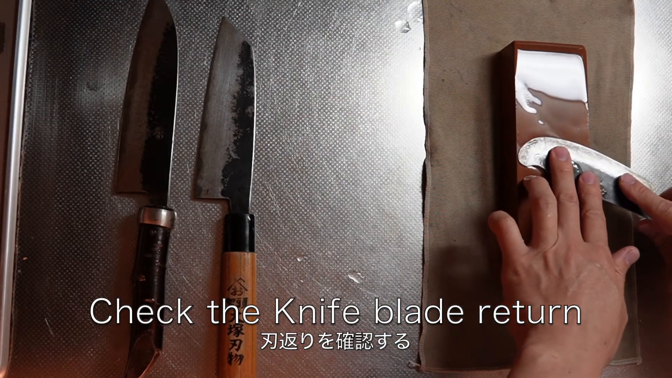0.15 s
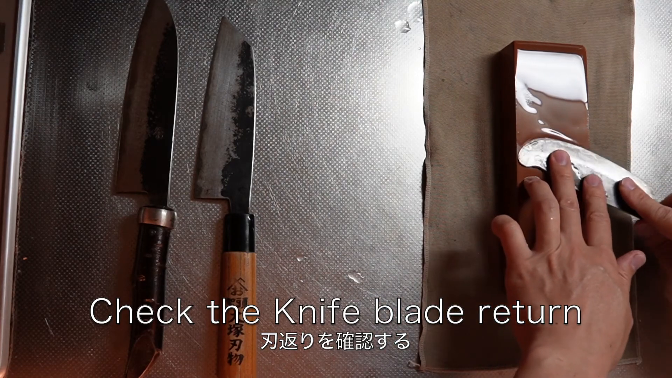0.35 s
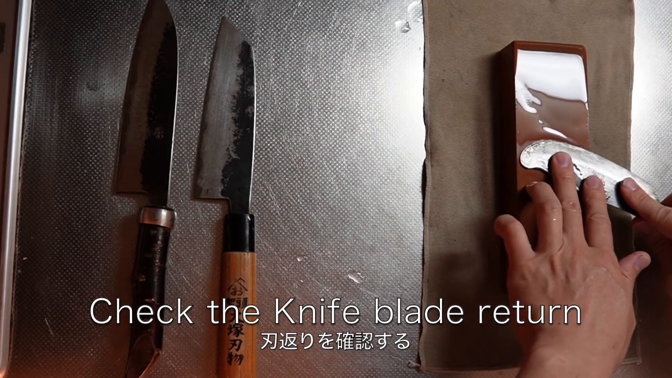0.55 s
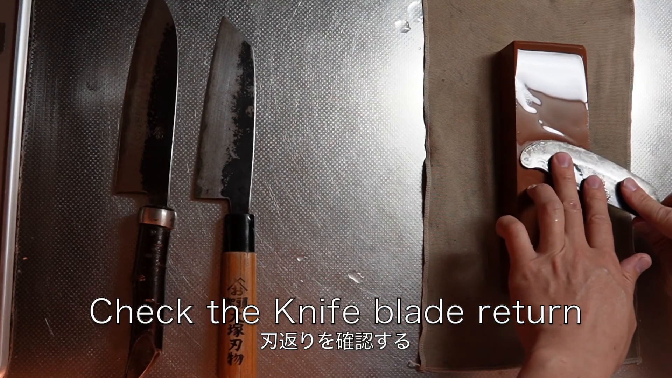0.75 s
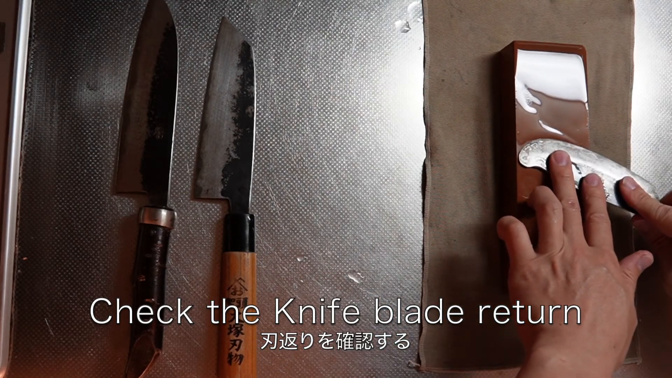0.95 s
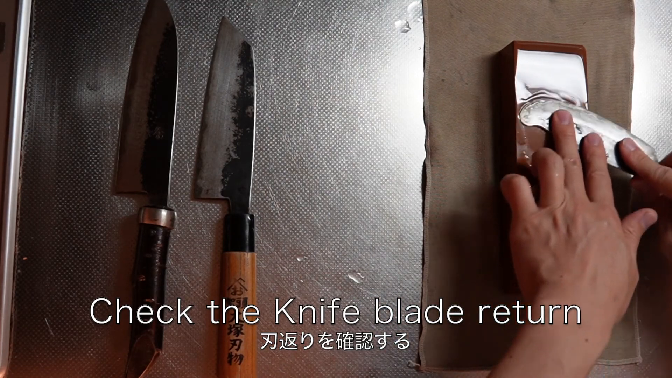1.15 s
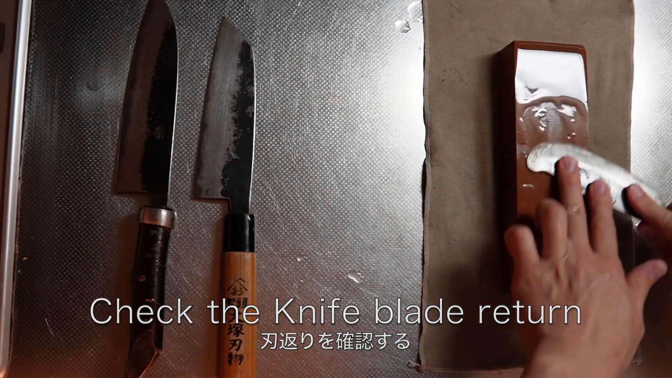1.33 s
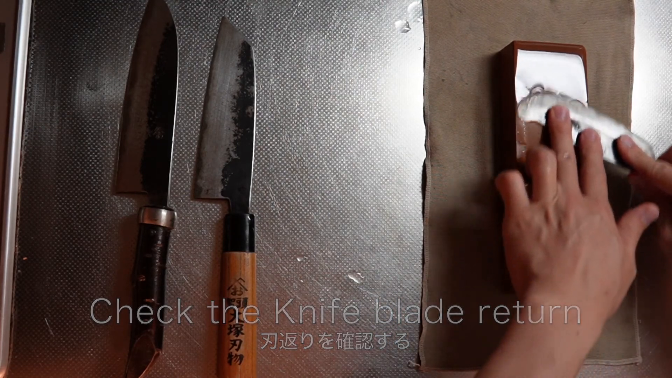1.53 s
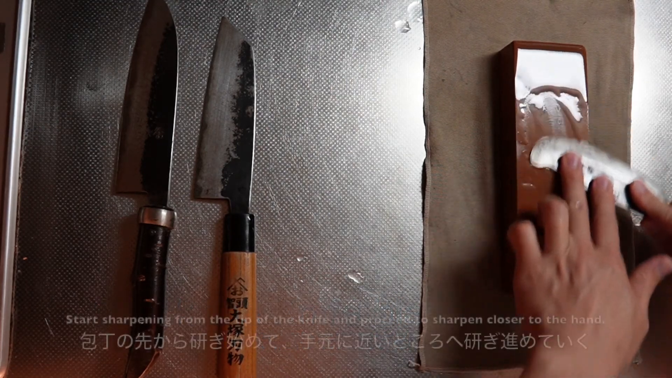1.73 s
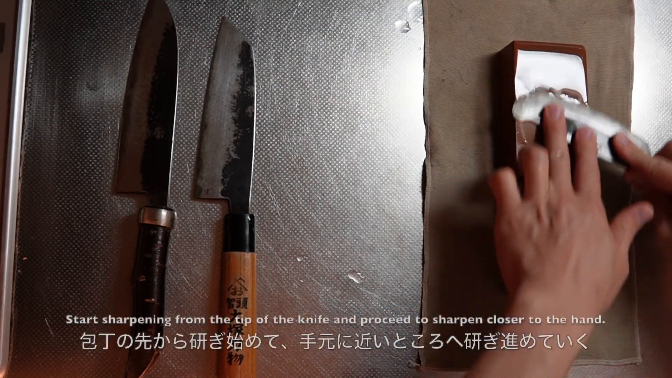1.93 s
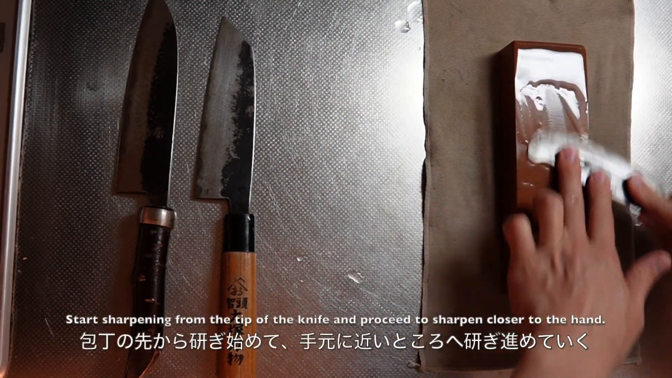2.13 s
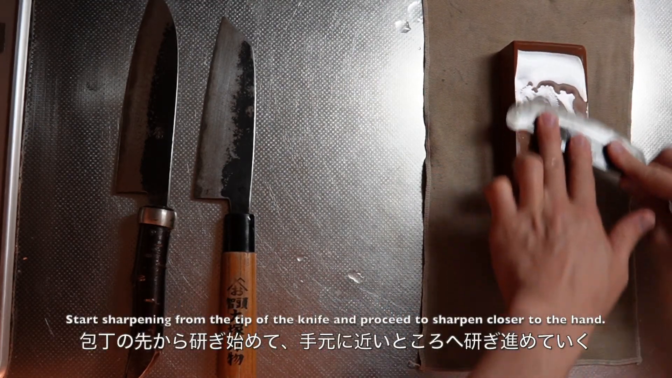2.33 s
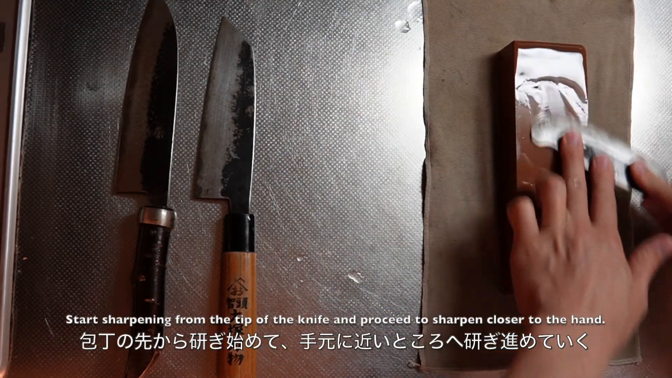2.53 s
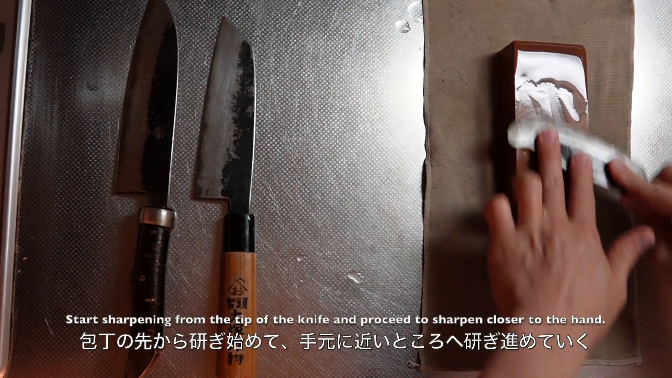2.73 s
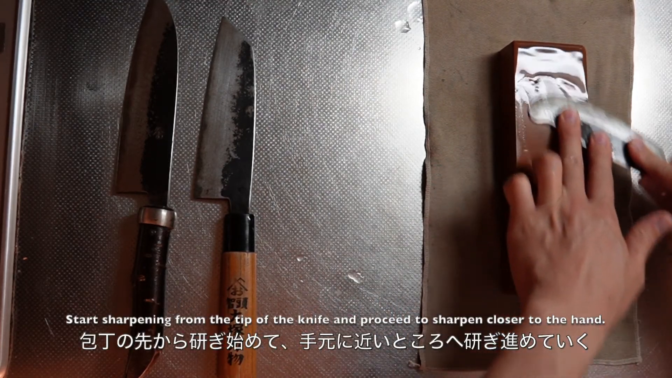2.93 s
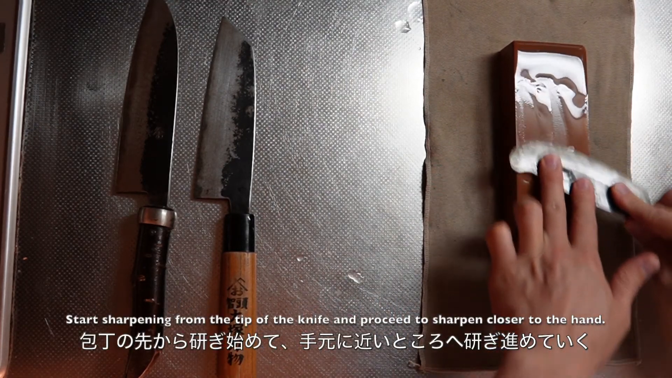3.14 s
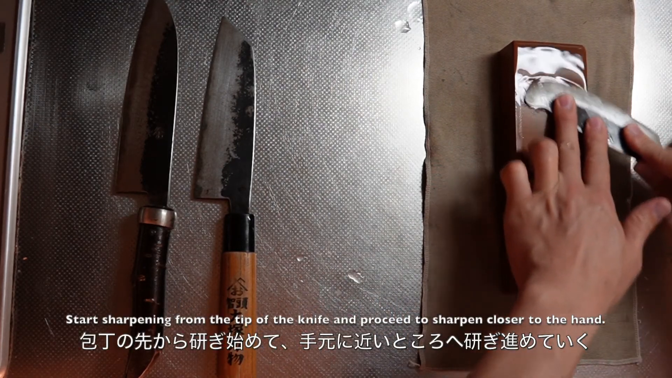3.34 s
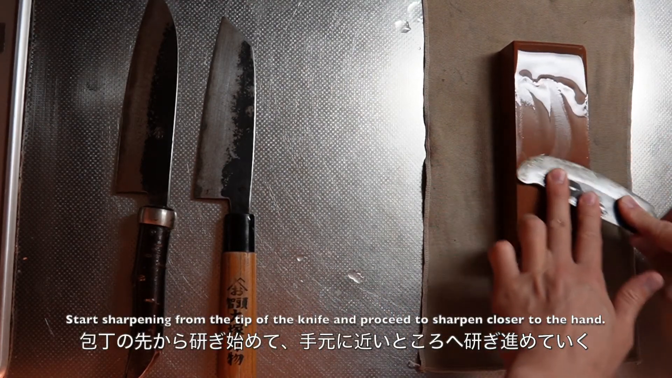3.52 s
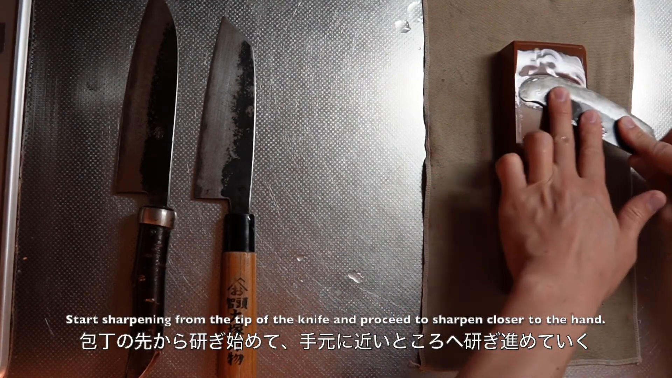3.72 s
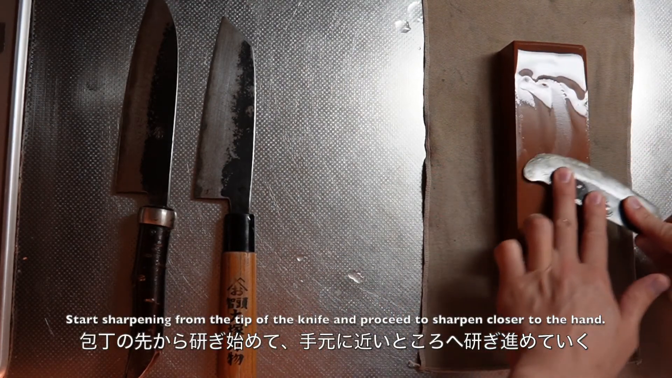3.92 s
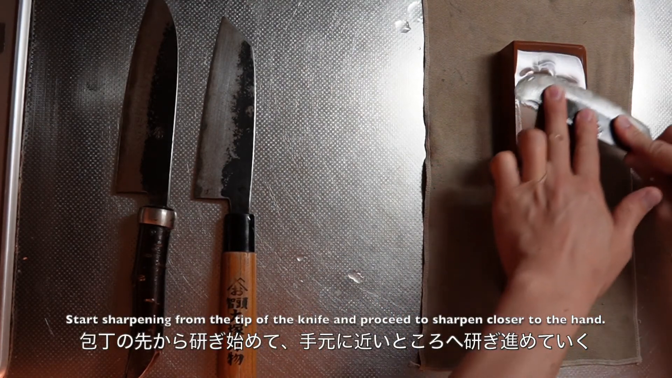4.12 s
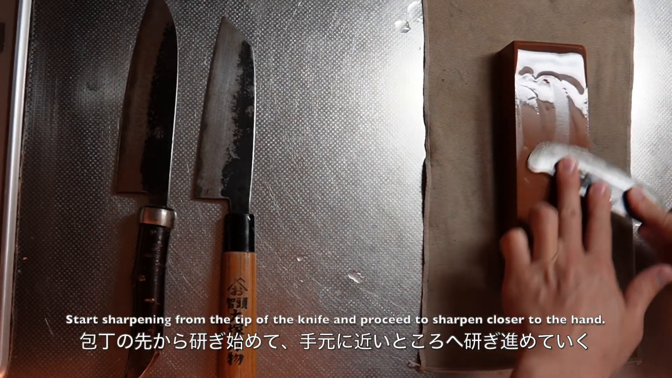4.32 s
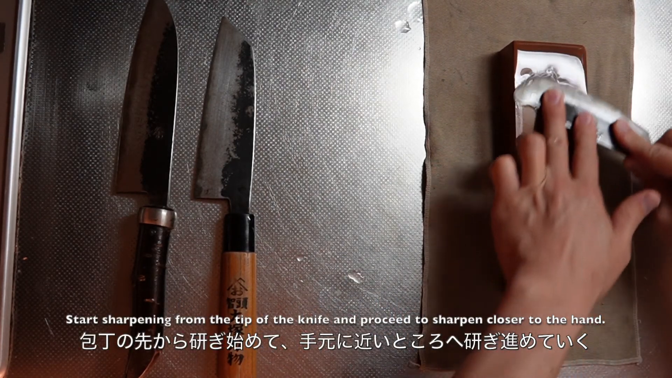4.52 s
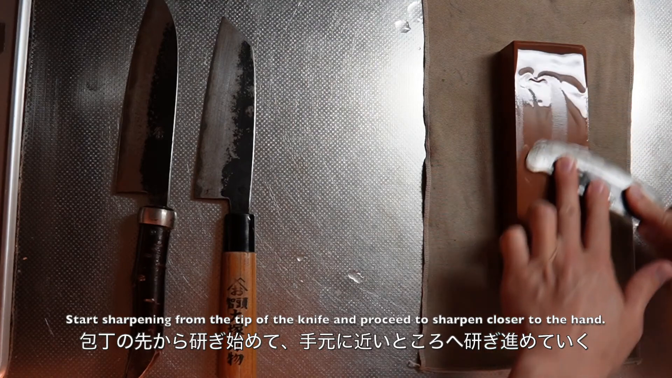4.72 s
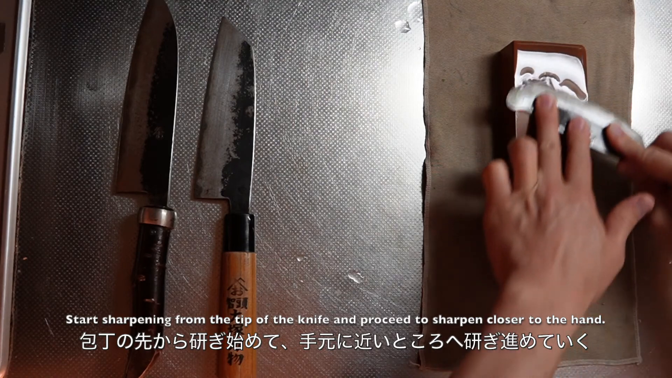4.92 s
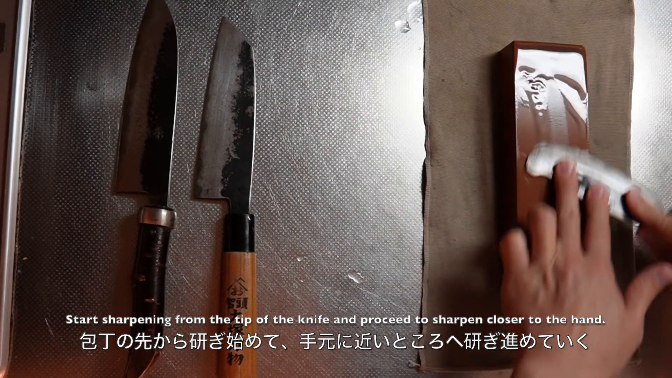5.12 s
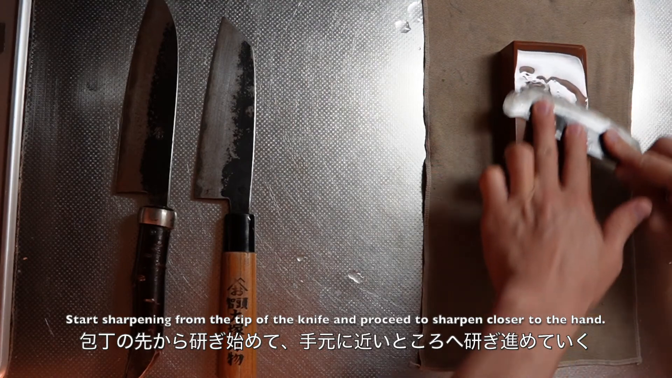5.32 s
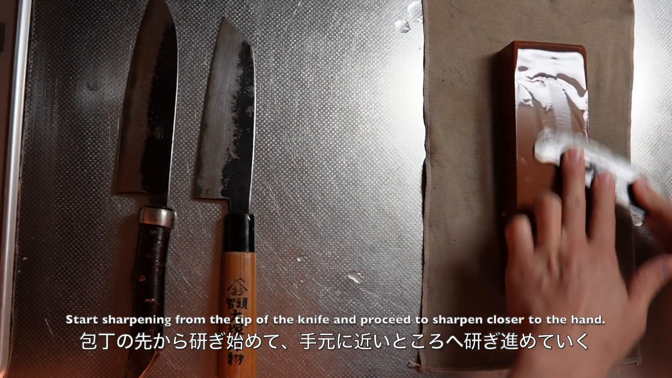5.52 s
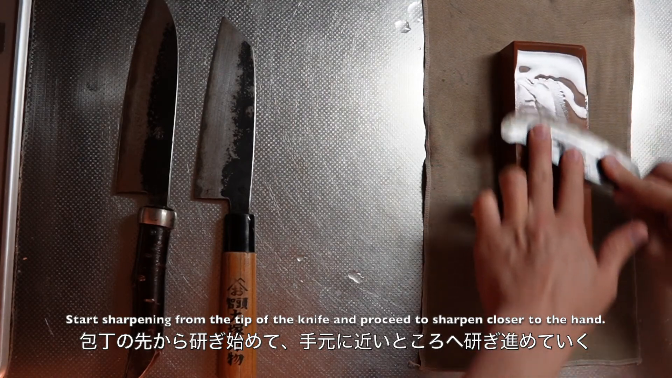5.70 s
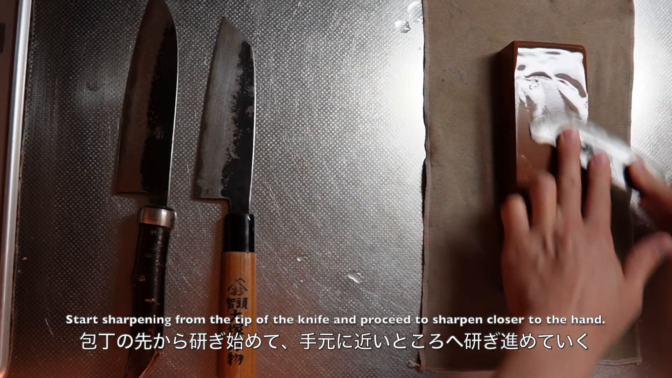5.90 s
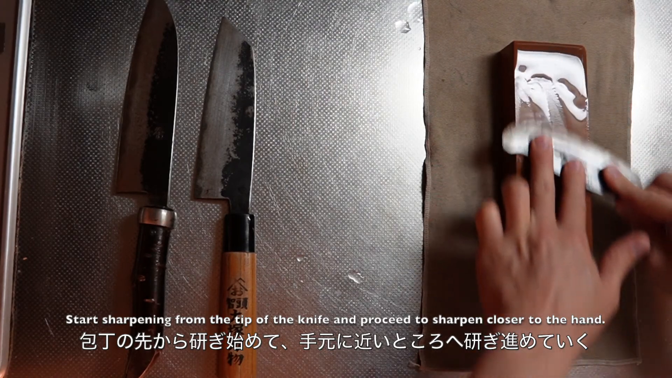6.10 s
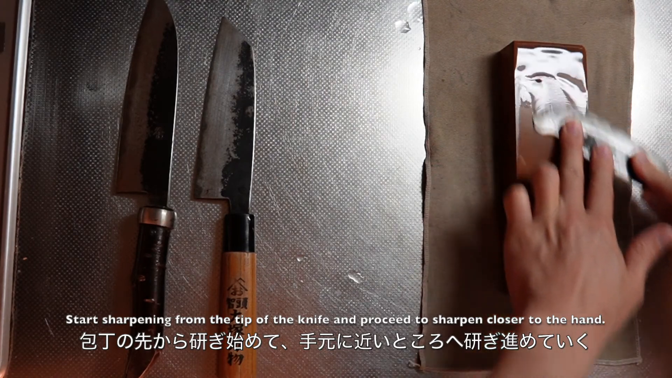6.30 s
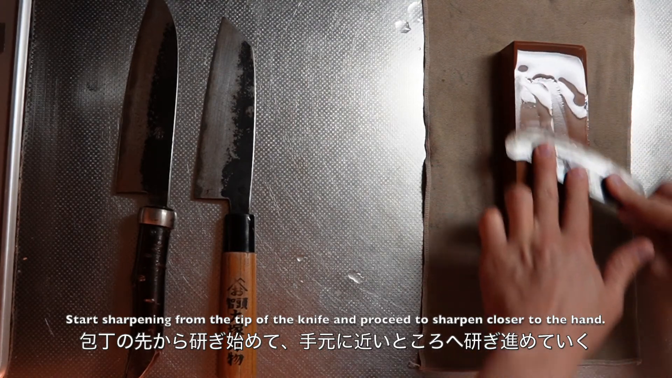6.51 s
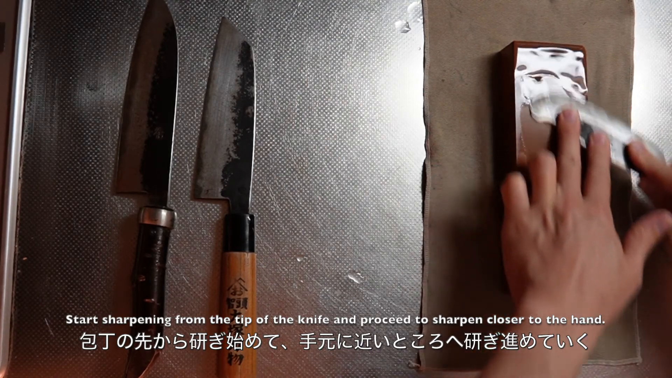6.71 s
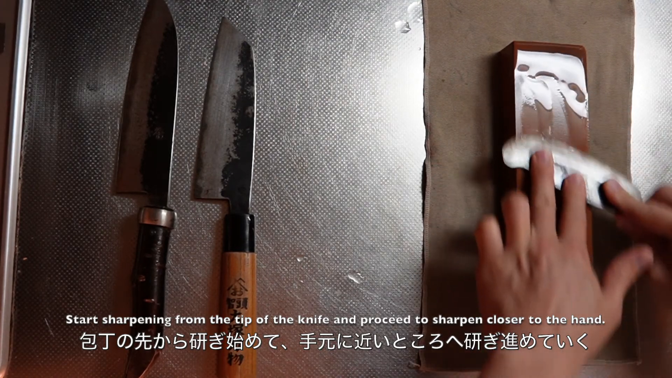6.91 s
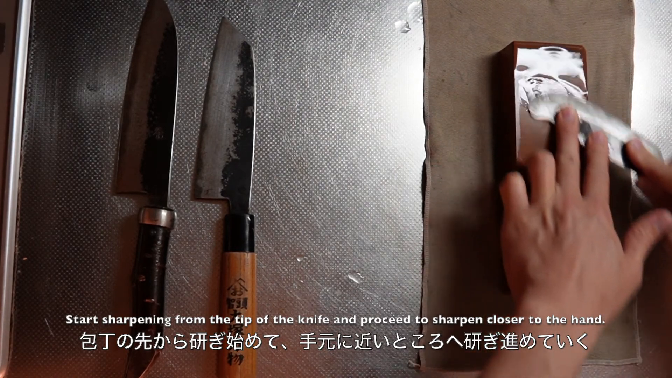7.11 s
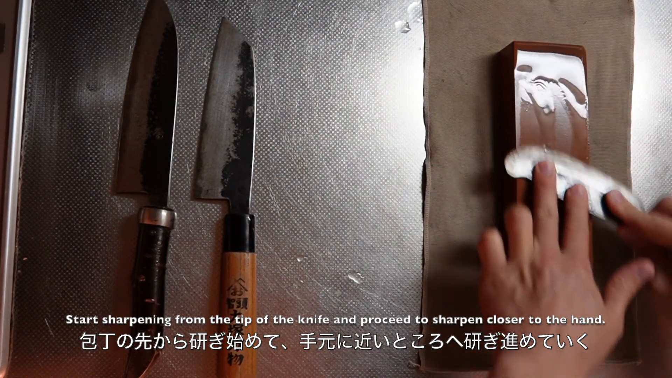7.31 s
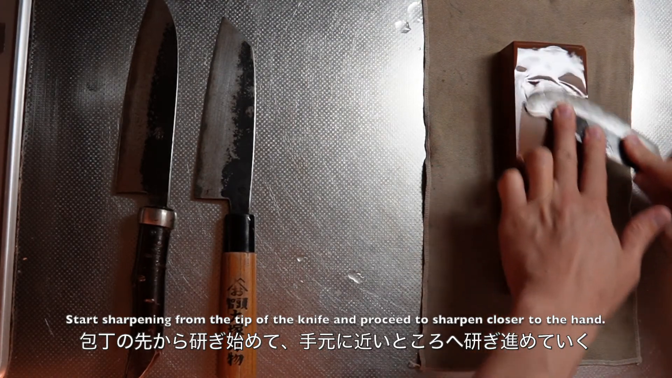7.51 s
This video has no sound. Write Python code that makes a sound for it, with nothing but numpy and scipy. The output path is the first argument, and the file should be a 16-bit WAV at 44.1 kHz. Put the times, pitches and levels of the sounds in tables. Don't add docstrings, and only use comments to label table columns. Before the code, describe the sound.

For the first second there is only soft room air, a low motor hum, a tiny tick and thin wet squeaks as the blade is set down. Then a steel knife is stroked steadily to and fro on a wet whetstone, nearly five bright, gritty, metallic scrapes a second, until the end. Close stereo microphone, quiet kitchen, no obvious echo.

```python
import sys
import numpy as np
from scipy import signal
from scipy.fft import rfft, irfft, next_fast_len
from scipy.io import wavfile

SR = 44100
rng = np.random.default_rng(int(sys.argv[2]) if len(sys.argv) > 2 else 0)


def master_out(mix):
    frames = np.transpose(np.atleast_2d(mix))
    ceiling = np.clip(frames, -1, 1)
    pcm = np.round(ceiling * 32767).astype(np.int16)
    wavfile.write(sys.argv[1], SR, pcm)


def invert_db(level):
    return 10 ** (np.asarray(level, dtype=float) / 20)


N = 332955

# [f/Hz, width/Hz, level/dB]
MAIN_RING = [(3820, 90, -5), (3985, 80, .3), (4090, 110, -1.5), (4250, 130, -4), (4420, 170, -7.5)]
SECOND_RING = [(6590, 110, 0.), (6800, 100, .5), (6970, 90, .5)]
UPPER_RINGS = [(4800, 120, -5), (5092, 60, 0.), (5420, 90, -5), (5728, 90, 0.), (6280, 130, -1.5),
               (7140, 60, -1.5), (7280, 70, -2.5), (7675, 100, -4)]
LOW_RINGS = [(2720, 90, -5.5), (2870, 60, -2), (3100, 170, -6), (3313, 40, -1.), (3561, 80, -2)]
HISS_RINGS = [(8250, 130, -1.5), (8850, 130, -2.5), (10020, 160, 0.), (11720, 200, -1.5)]
STONE_RINGS = [(1200, 110, -5), (1240, 15, -2), (1800, 150, -5), (2015, 90, 0.), (2250, 150, -1.5)]
# [f/Hz, level/dB per Hz]
SCRATCH = [(2550, -9), (2700, -14), (3600, -12), (4600, -2.5), (6000, -3.5), (7000, -4), (7700, -11),
           (9000, -6.5), (11000, -7.5), (13000, -7.5), (15500, -8.5)]
# [t/s, level/dB]
SECOND_SHARE = [(0., -8), (1.3, -4), (2.5, -6), (4.5, -5), (7.55, -4)]
# [f/Hz, sway/dB, place in the to-and-fro after the push bite/0-1]
CONTACT = [ (2720, 3.2, .6), (2870, 2.2, .43), (3313, 6.5, .06), (3561, 4.5, .57), (3985, 1.5, .08),
           (4090, 1.1, .8), (4250, 2.1, .5), (4420, 3.5, .46), (4800, 3.1, .8), (5092, 2.1, .37),
           (6280, 4.1, .83), (6590, 1.5, .56), (6800, 2.2, .42), (6970, 2.1, .39), (7140, 1.5, .6),
           (7280, 3.5, .64), (7675, 2.5, .45), (8250, 3.5, .6), (10020, 3.1, .85)]
# [f/Hz, likeness/0-1]
BLADE_ALIKE = [(1200, .8), (2800, .91), (4200, .85), (6500, .74), (9000, .6), (13000, .44)]
# [f/Hz, left over right/dB]
BLADE_PAN = [(2800, -.1), (5000, -.3), (9500, 1.), (13500, -.1)]

# [t/s, pressure/dB, free ringing of the blade/dB]
SETTLING = [
    (0., -20, -1),
    (.12, -26, -1),
    (.38, -23, -3),
    (.5, -21, -2),
    (.62, -26, -4),
    (.72, -31, 2),
    (.95, -41, 0.),
    (1., -24, 6),
]
WORKING = [(1.06, -9.2, -0.6), (1.12, -4.8, 1.1), (1.4, -0.6, 2.9), (2.3, 1.8, 0.4), (3.2, 2.0, -0.3),
           (4.2, -0.3, -0.1), (5.2, 0.7, -1.2), (6.3, -0.7, -1.2), (7.55, -3.2, -1.0)]
# [bite t/s, bite/dB, ringing/dB, slide t/s, slide/dB]
PULLS = [(1.077, 6.2, 1.1, 1.114, 1.4), (1.4, 6.1, -0.0, 1.489, 4.4), (1.827, 6.7, -0.4, 1.902, 3.6),
         (2.251, 7.2, -0.6, 2.332, 4.9), (2.666, 7.3, -0.7, 2.756, 4.6), (3.11, 7.9, -0.3, 3.19, 4.2),
         (3.541, 6.9, -0.0, 3.619, 5.2), (3.969, 6.0, -0.8, 4.041, 5.2), (4.394, 4.9, 0.3, 4.462, 5.6),
         (4.819, 6.0, 0.2, 4.871, 5.4), (5.211, 5.5, -2.0, 5.289, 8.4), (5.628, 5.5, -0.1, 5.697, 6.6),
         (6.049, 4.4, 0.2, 6.121, 6.9), (6.455, 5.8, 0.1, 6.533, 8.2), (6.882, 7.0, -0.3, 6.953, 7.8),
         (7.293, 7.2, 0.1, 7.364, 8.5)]
PUSHES = [(1.222, 8.2, -1.6, 1.306, 5.9), (1.644, 6.5, -1.3, 1.711, 6.0), (2.053, 7.4, -3.2, 2.114, 6.3),
          (2.461, 5.6, 2.1, 2.519, 4.3), (2.913, 5.5, 0.9, 2.973, 5.1), (3.342, 4.6, 0.7, 3.401, 3.3),
          (3.773, 5.5, 1.7, 3.822, 4.1), (4.195, 7.4, -0.7, 4.246, 5.9), (4.615, 7.7, 0.3, 4.672, 4.5),
          (5.017, 5.2, 3.2, 5.062, 4.9), (5.433, 5.9, 2.7, 5.474, 6.0), (5.865, 8.3, 0.5, 5.914, 5.2),
          (6.265, 8.3, 0.4, 6.314, 7.4), (6.686, 8.9, -0.6, 6.744, 7.6), (7.096, 7.7, 1.1, 7.149, 7.6),
          (7.507, 9.1, -1.5, 7.574, 9.1)]
# [t/s, level/dB]
FALTERS = [
    (1.232, -6.6),
    (1.654, -7.6),
    (2.07, -6.2),
]
# [t/s, level/dB]
NUDGE = [
    (.452, 12),
]
# (rise/s, fall/s)
PULL_BITE_S, PULL_SLIDE_S, PUSH_BITE_S, PUSH_SLIDE_S = (.034, .033), (.026, .055), (.058, .021), (.028, .037)
NUDGE_S, FALTER_S = (.022, .018), (.016, .03)
PULL_BITE, PULL_SLIDE = (.94, 1.18, .98, .87), (-.01, .88, 1.08, .33)
PUSH_BITE, PUSH_SLIDE = (1.32, 1.01, .38, .6), (.74, .98, .92, .89)
FALTER, RINGING = (.49, .41, 1.01, -.21), (1.15, -.11, -.51, -.12)
NUDGED = (1.2, .95, .5, .6)
VOICE_DB = (-49.9, -48.3, -49.0, -56.4)

# [t/s, peak level/dB, ring f/Hz]
SNAGS = [(1.3009, -37, 4030), (2.3893, -24, 4100), (2.4368, -35, 4220), (3.0903, -16, 5240),
         (3.7328, -30, 3990), (4.194, -28.5, 4150), (4.5709, -27, 4200), (4.996, -31, 4200),
         (5.3108, -25, 4530), (5.433, -34, 4040), (5.831, -26, 4780), (5.85, -29, 3970),
         (6.1449, -24, 5030), (6.1848, -31, 4150)]
# [t/s, peak level/dB, ring f/Hz]
TICKS = [
    (.2444, -44.5, 9000),
    (.2462, -42.5, 6500),
    (.2476, -48, 4700),
    (.5145, -54, 8000),
]
# [t/s, f/Hz, level/dB]
HIGH_SQUEAK = [(.2, 11300, -82), (.255, 12950, -77), (.315, 12150, -76), (.395, 12800, -71),
               (.44, 13000, -75), (.515, 13400, -74), (.555, 12750, -72), (.59, 13050, -73),
               (.65, 12000, -84)]
TOP_SQUEAK = [(.29, 13900, -85), (.33, 14150, -81), (.37, 14500, -82), (.43, 14850, -80), (.47, 14900, -85)]
LOW_SQUEAK = [(.2, 5100, -82), (.275, 5480, -73), (.31, 5270, -73), (.365, 5250, -71), (.39, 5250, -86),
              (.44, 5150, -73), (.52, 5580, -74), (.61, 5580, -79)]
MID_SQUEAK = [(0.05, 6715, -93), (0.096, 6860, -83), (0.158, 6682, -90), (0.192, 6849, -74),
              (0.24, 6703, -80)]
DULL_SQUEAK = [(.16, 4250, -76), (.2, 4200, -69), (.215, 4150, -75)]

# [t/s, f/Hz, level/dB]
MOAN = [
    (0., 252, -61),
    (.14, 255, -61),
    (.21, 250, -70),
]
# [f/Hz, width/Hz, rms level/dB]
MOTOR = [(199, 30, -74), (260, 20, -72), (376, 12, -75), (495, 8, -74), (590, 40, -76), (1105, 3, -77.5)]
# [t/s, level/dB]
WHINE = [(0., -66), (.45, -69), (.65, -64.5), (1., -60), (1.9, -75), (2.5, -69), (3., -70), (3.5, -61),
         (4.3, -69), (5., -71), (5.5, -60.5), (6.6, -73), (7.55, -64)]
# [f/Hz, level/dB per Hz]
ROOM = [(20, -34), (40, -7), (75, -11.5), (120, -7), (190, -2), (260, -5), (330, -8.5), (600, -13.5),
        (900, -19), (1600, -18.5), (2100, -27.5), (2800, -24), (6000, -33), (15700, -39)]
# [t/s, level/dB]
ROOM_LEVEL = [(0., -47), (.8, -49), (1.2, -47.5), (4., -47), (7.55, -47)]
# [f/Hz, likeness/0-1]
ROOM_ALIKE = [(60, 0.97), (180, 0.95), (550, 0.83), (1650, 0.53), (4970, 0.55), (15000, 0.13)]


def strokes():
    main_db, upper_db, hiss_db, low_db = effort()
    coarse = grit(9000, 1.4, clump_db=-0.24, jolts_per_s=44, jolt_s=0.002)
    fine = grit(18000, 0.75, clump_db=-0.2, jolts_per_s=37, jolt_s=0.014)

    main = rings(coarse, MAIN_RING, patchy_db=1.5)
    upper = invert_db(-3.5) * rings(coarse, UPPER_RINGS, patchy_db=2.8)
    upper = upper + invert_db(-5.5) * scratch(fine, (4000, 8800), patchy_db=1.8, jagged_db=1.2, count=5)
    hiss = invert_db(-8.5) * rings(coarse, HISS_RINGS, patchy_db=4)
    hiss = hiss + invert_db(0.6) * scratch(fine, (7000, 18500), patchy_db=1.8, jagged_db=1.5, count=7)
    low = invert_db(-1.0) * rings(-coarse, LOW_RINGS, patchy_db=2.0)
    low = low + invert_db(-8.5) * scratch(fine, (2300, 4200), patchy_db=1.2, jagged_db=6.0, count=2)
    second_db = (main_db + 2 * upper_db) / 3 + in_time(SECOND_SHARE)[0]
    second = invert_db(second_db) * rings(coarse, SECOND_RING, patchy_db=2)

    blade = second + invert_db(main_db) * main + invert_db(upper_db) * upper + invert_db(hiss_db) * hiss + invert_db(low_db) * low
    blade = signal.sosfilt(signal.butter(6, 2620, "high", fs=SR, output="sos"), blade)
    return blade + invert_db(low_db - 10.5) * rings(fine, STONE_RINGS, patchy_db=1.3)


def effort():
    swell = gesture(*np.transpose(FALTERS), FALTER_S, FALTER)
    swell = swell + gesture(*np.transpose(NUDGE), NUDGE_S, NUDGED)
    pull = (PULLS, PULL_BITE_S, PULL_BITE, PULL_SLIDE_S, PULL_SLIDE)
    push = (PUSHES, PUSH_BITE_S, PUSH_BITE, PUSH_SLIDE_S, PUSH_SLIDE)
    for rows, bite_s, bite, slide_s, slide in (pull, push):
        bite_at, bite_db, ring_db, slide_at, slide_db = np.transpose(rows)
        swell = swell + gesture(bite_at, bite_db, bite_s, bite)
        swell = swell + gesture(bite_at, ring_db, bite_s, RINGING)
        swell = swell + gesture(slide_at, slide_db, slide_s, slide)
    pressure_db, free_db = in_time(SETTLING + WORKING)
    parts = []
    for db, part in zip(VOICE_DB, swell):
        parts.append(db + pressure_db + np.interp(np.arange(N) / 64, np.arange(len(part)), part))
    return [parts[0] + free_db] + parts[1:]


def gesture(times, db, shape_s, shares):
    late = np.arange(0, N + 64, 64) / SR - np.array(times)[:, None]
    side_s = np.where(late < 0, shape_s[0], shape_s[1])
    bells = np.exp(-.5 * (late / side_s) ** 2)
    return np.outer(shares, np.array(db) @ bells)


def grit(per_s, size_db, clump_db, jolts_per_s, jolt_s):
    jolts = (rng.random(N) < jolts_per_s / SR) * np.minimum(rng.exponential(1, N), 2)
    pressure = 1 + 0.2 * signal.lfilter([1], [1, -np.exp(-1 / (jolt_s * SR))], jolts)
    grain_db = size_db * np.minimum(rng.exponential(1, N), 4.0)
    sizes = pressure * invert_db(grain_db + clump_db * drift(57.0))
    hits = rng.random(N) < per_s / SR
    return rms_one(sizes * hits * rng.standard_normal((2, N)))


def rings(plucks, modes, patchy_db):
    out = 0
    for k, (hz, width, db) in enumerate(modes):
        contact = stretch(invert_db(patchy_db * wander(8) + travel(hz)))
        out = out + (-1) ** k * invert_db(db) * placed(resonate(plucks * contact, hz, width), hz)
    return rms_one(out)


def travel(hz):
    bites = np.transpose(PUSHES)[0]
    bites = np.append(2 * bites[0] - bites[1], bites)
    turns = np.interp(np.arange(N // 40 + 2) * 40 / SR, bites, np.arange(len(bites)))
    return sum(db * np.cos(2 * np.pi * (turns - place))
               for at, db, place in CONTACT if abs(at / hz - 1) < .004)


def scratch(plucks, bands_hz, patchy_db, jagged_db, count):
    size = next_fast_len(N)
    hz = np.arange(1, size // 2 + 2) * SR / size
    jags = np.interp(hz, np.arange(400) * 60, rng.standard_normal(400))
    spectrum = placed(rfft(plucks, size), hz) * invert_db(at_hz(SCRATCH, hz) + jagged_db * jags)
    low_hz, high_hz = bands_hz
    place = np.log(hz / low_hz) / np.log(high_hz / low_hz) * (count + 1)
    out = 0
    for k in range(1, count + 1):
        band = spectrum * np.maximum(1 - abs(place - k), 0)
        flicker = stretch(invert_db(patchy_db * wander(13.4)))
        out = out + flicker * irfft(band.astype(np.complex64), size)[:, :N]
    return rms_one(out)


def placed(pair, hz):
    lean_db = at_hz(BLADE_PAN, hz) * np.array([[.5], [-.5]])
    return spread(pair, at_hz(BLADE_ALIKE, hz)) * invert_db(lean_db)


def snags():
    out, t = np.zeros(N + 400), np.arange(400) / SR
    for s, db, hz in SNAGS + TICKS:
        at = round(s * SR)
        shape = np.exp(-t * hz / 3) * np.minimum(t / .0001, 1)
        out[at:at + 400] += invert_db(db) * np.sin(2 * np.pi * hz * t) * shape
    return out[:N]


def ticks():
    out, t = np.zeros((2, N + 600)), np.arange(600) / SR
    for s, db, hz in TICKS:
        at = round(s * SR)
        crackle = spread(rng.standard_normal((2, len(t))), .8)
        out[:, at:at + len(t)] += invert_db(db - 6) * np.exp(-t / .0015) * crackle
    band = signal.butter(2, [1500, 11500], "band", fs=SR, output="sos")
    return signal.sosfilt(band, out[:, :N])


def water_film():
    tracks = (HIGH_SQUEAK, TOP_SQUEAK, LOW_SQUEAK, MID_SQUEAK, DULL_SQUEAK)
    film = sum(squeak(rows, wobble=.006, flutter_db=3.5) for rows in tracks)
    return film * invert_db(np.array([[.4], [-.4]]))


def squeak(rows, wobble, flutter_db):
    hz, db = in_time(rows)
    t = np.arange(N) / SR
    gate = np.clip(np.minimum(t - rows[0][0], rows[-1][0] - t) / 0.013, 0, 1)
    phase = 2 * np.pi * np.cumsum(hz * (1 + wobble * drift(90.))) / SR
    return gate * invert_db(db + 2 + flutter_db * drift(50)) * np.sin(phase)


def motor_moan():
    return squeak(MOAN, wobble=.02, flutter_db=2.5)


def room():
    white = rng.standard_normal((2, N))
    other = white[:, ::-1]
    size = next_fast_len(N)
    hz = np.arange(1, size // 2 + 2) * SR / size
    air = irfft(invert_db(at_hz(ROOM, hz)) * spread(rfft(white, size), at_hz(ROOM_ALIKE, hz)), size)[:, :N]
    air = invert_db(in_time(ROOM_LEVEL)[0] - 8.5) * rms_one(air)

    tones = 0
    for tone_hz, width, db in MOTOR:
        tone = rms_one(resonate(resonate(other, tone_hz, width), tone_hz, width))
        tones = tones + invert_db(db) * spread(tone, at_hz(ROOM_ALIKE, tone_hz))
    hum = invert_db(-64.5) * np.sqrt(2) * np.sin(2 * np.pi * 62 * np.arange(N) / SR)

    whine = spread(rms_one(resonate(resonate(other, 2080, 380), 2260, 380)), .8)
    whine = invert_db(in_time(WHINE)[0] - 3.5 + 0.68 * drift(3.7)) * whine
    return air + tones + hum + whine


def resonate(x, hz, width):
    r = np.exp(-np.pi * width / SR)
    top = np.array([1, 0, -1]) * (1 - r * r) / 2
    return signal.lfilter(top, [1, -2 * r * np.cos(2 * np.pi * hz / SR), r * r], x + 1e-18)


def spread(pair, alike):
    alike = np.clip(alike, 0, 1)
    mid = np.sqrt((1 + alike) / 2) * pair[0]
    side = np.sqrt((1 - alike) / 2) * pair[1]
    return mid + side * [[1], [-1]]


def wander(rate):
    r = np.exp(-80 * np.pi * rate / SR)
    noise = rng.standard_normal(N // 40 + 2002)
    return rms_one(signal.lfilter([1], [1, -2 * r, r * r], noise)[2000:])


def stretch(slow):
    return np.interp(np.arange(N) / 40, np.arange(len(slow)), slow)


def drift(rate):
    return stretch(wander(rate))


def rms_one(x):
    return x / np.sqrt(np.mean(x ** 2) + 1e-20)


def in_time(rows):
    s, *columns = np.transpose(rows)
    return [np.interp(np.arange(N) / SR, s, c) for c in columns]


def at_hz(points, hz):
    table_hz, values = np.array(points)[:, 0], np.array(points)[:, 1]
    return np.interp(np.log(hz), np.log(table_hz), values)


def scene():
    blade = strokes() + snags() + ticks()
    return blade + water_film() + motor_moan() + room()


def band_limit(x):
    return signal.sosfilt(signal.butter(12, 15730, fs=SR, output="sos"), x)


def record(dry):
    return band_limit(dry)


dry = scene()
out = record(dry)
master_out(out)
```